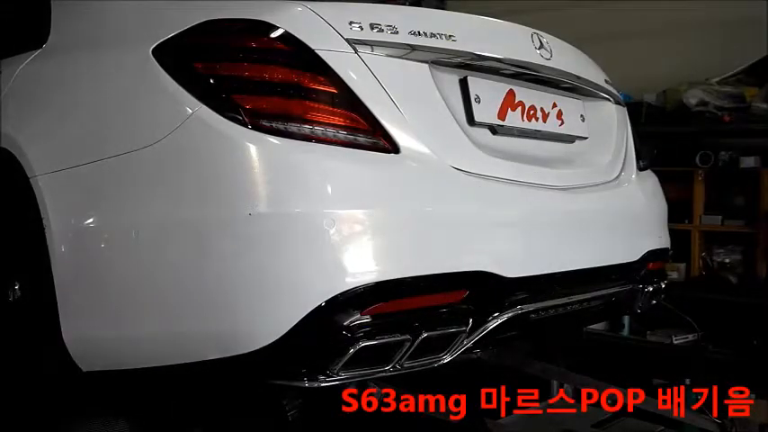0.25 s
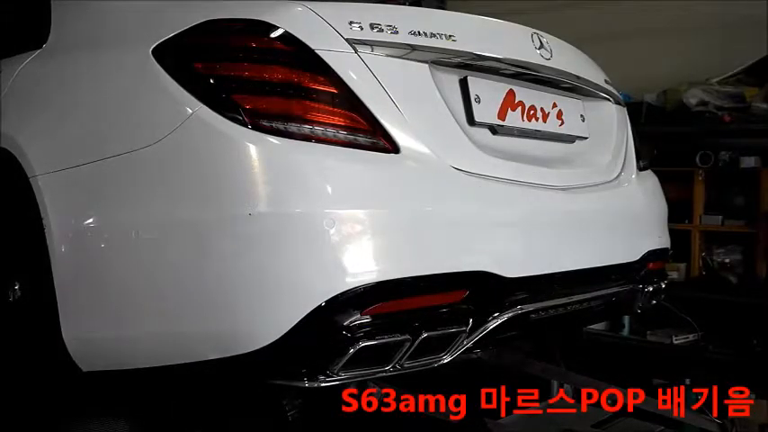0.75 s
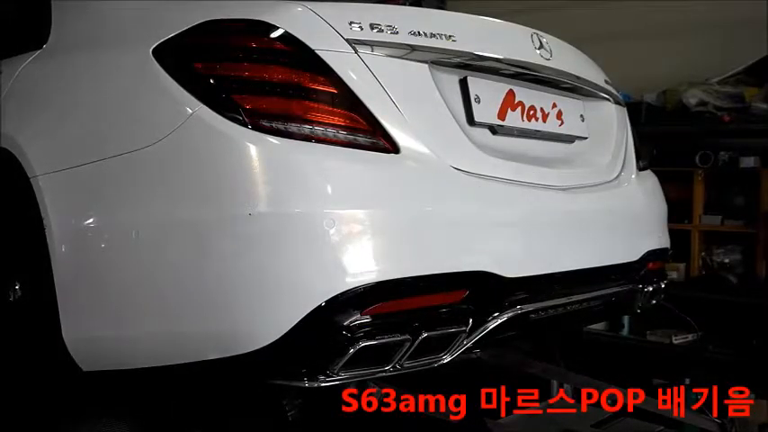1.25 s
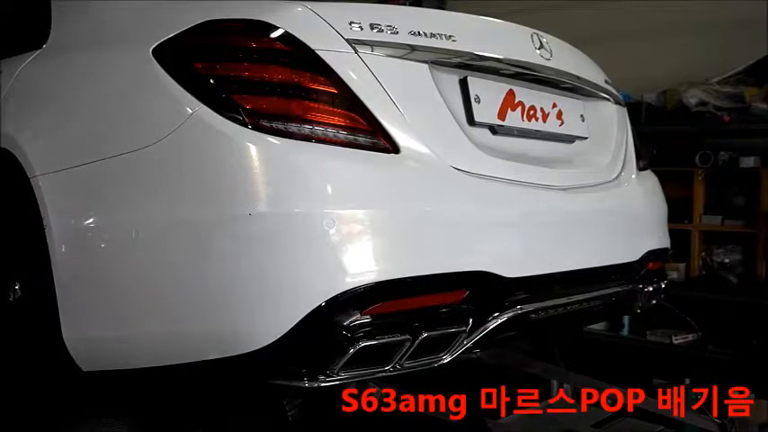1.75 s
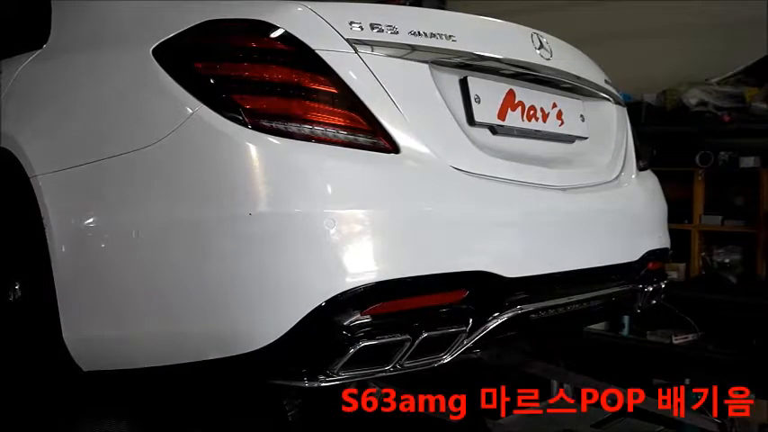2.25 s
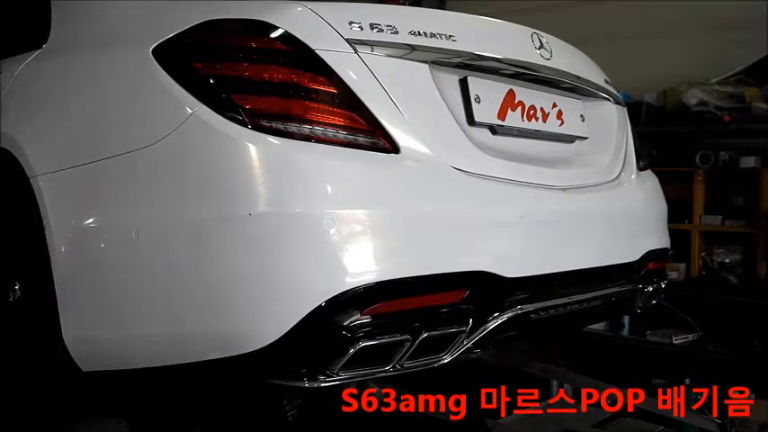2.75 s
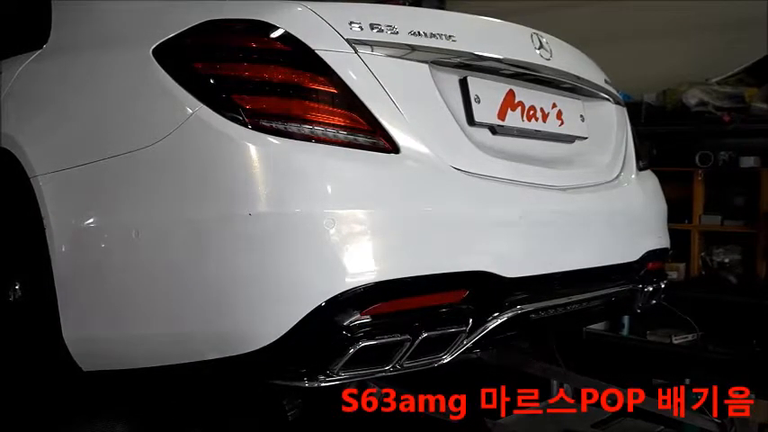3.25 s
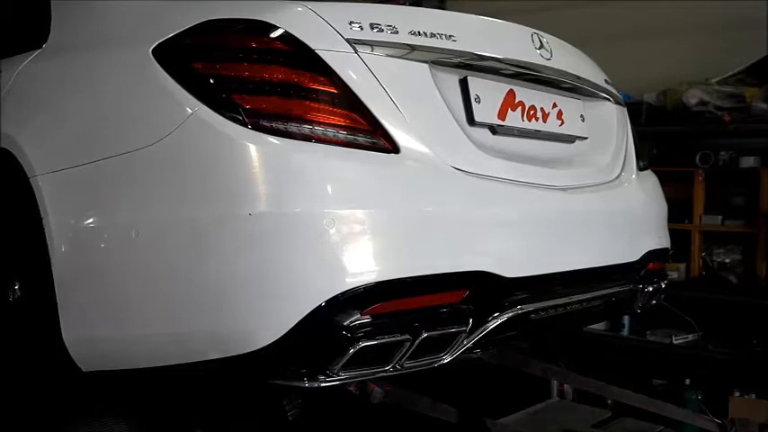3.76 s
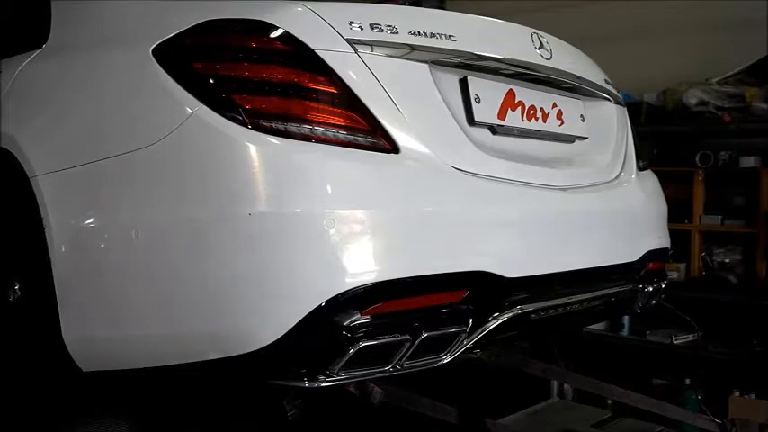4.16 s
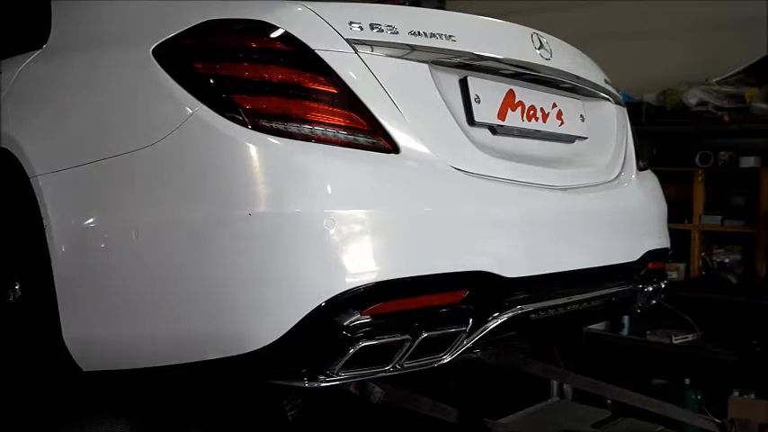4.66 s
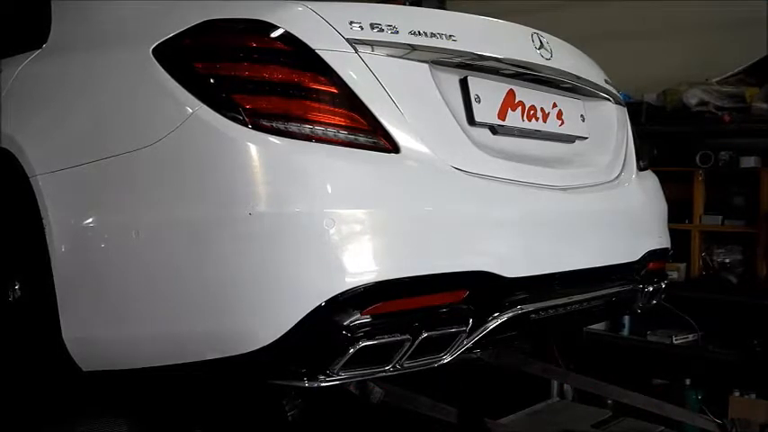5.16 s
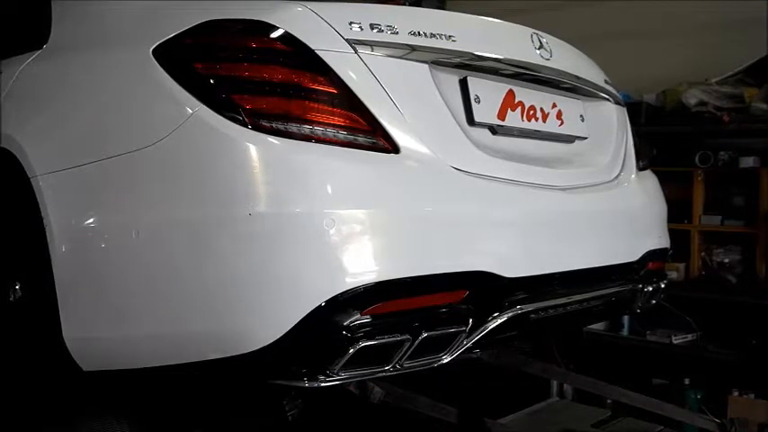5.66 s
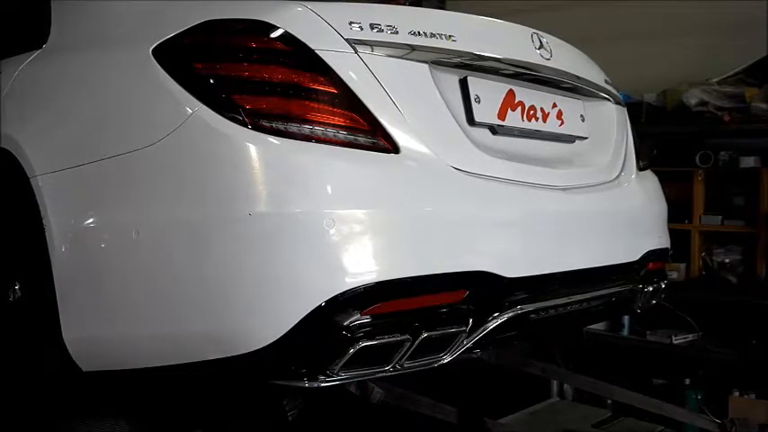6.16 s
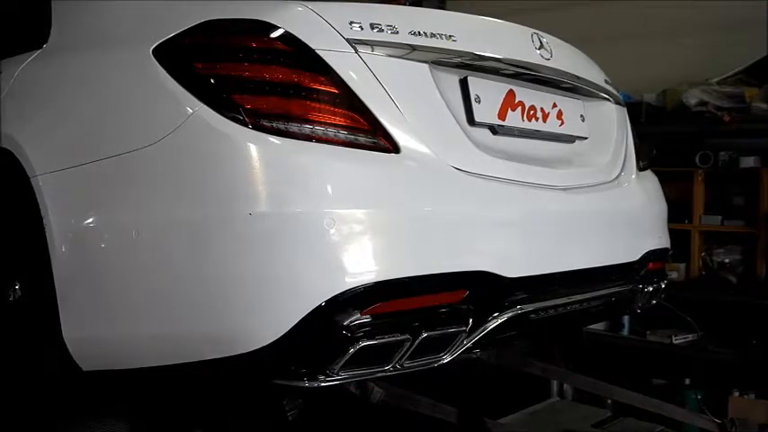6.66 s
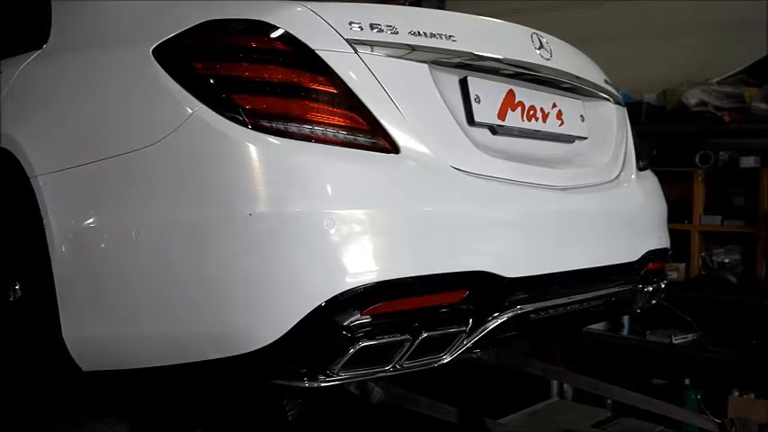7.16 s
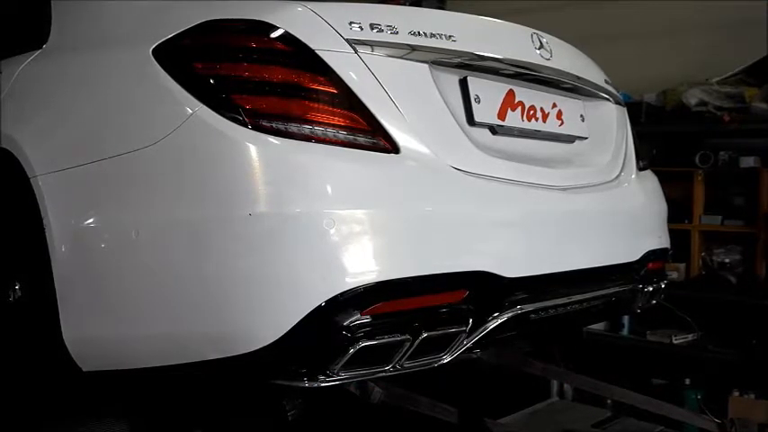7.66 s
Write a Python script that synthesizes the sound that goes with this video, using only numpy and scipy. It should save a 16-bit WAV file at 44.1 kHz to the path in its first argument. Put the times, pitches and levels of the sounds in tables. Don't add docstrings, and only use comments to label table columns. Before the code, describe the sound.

A powerful eight-cylinder car idles low in a hard-walled workshop, microphone close behind the tailpipes. The driver stabs the throttle five times; each rev roars up with a raspy, uneven growl, then breaks as the throttle shuts into gunshot-like cracks and muffled burbles. The engine drops back to a rumbling idle before the next stab, while the walls ring on.

```python
import sys
import numpy as np
from scipy import signal
from scipy.fft import rfft, irfft
from scipy.io import wavfile
from scipy.ndimage import uniform_filter1d

SR = 44100
rng = np.random.default_rng(int(sys.argv[2]) if len(sys.argv) > 2 else 0)


def master_out(mix):
    frames = np.transpose(np.atleast_2d(mix))
    ceiling = np.clip(frames, -1, 1)
    pcm = np.round(ceiling * 32767).astype(np.int16)
    wavfile.write(sys.argv[1], SR, pcm)


def gain_from_db(level_db):
    decades = np.asarray(level_db, float) / 20
    return 10 ** decades


N = 349272
TIME = np.arange(N) / SR

# stab [s], first crack [s], back at idle [s], top speed [firings/s],
# speed just before the stab [firings/s].
BLIPS = [
    (.305, 0.961, 1.554, 250, 65.5),
    (1.87, 2.544, 3.15, 245, 62),
    (3.43, 4.052, 4.85, 242, 68),
    (5.049, 5.63, 6.33, 242, 72.7),
    (6.545, 7.044, 7.72, 255, 72),
]
# time after the stab [s], share of top speed.
CLIMB = [(.06, 0.35), (.17, 0.68), (.32, 0.98), (.43, 1.0)]
FALL = [(.36, .64), (.6, .61)]
CLIMB_PACE = [.85, 1.15, .98, 1.08, 1.02]
START_PER_S, IDLE_PER_S = 76, 80
OPEN_BEFORE_S, OPEN_AFTER_S = 0.03, 0.041
LIFT_S = 0.33

# before the stab [dB], while revving [dB], clamped by the crack [dB],
# the same for the hiss [dB], back at idle [dB].
GAIN = [(8.5, 1, -7, -15, 0.5), (-0.5, -0.3, -2.6, -2, 4), (4.5, 1.06, -8.3, 5, -2), (-2.5, 0, -9, 1, -2.5),
        (-2.5, 0.57, 0, 8.5, 7.5)]
START_GAIN_DB, CLAMP_S = 12.5, 0.018
# held [s], push at the stab [dB], at the end of the hold [dB],
# at lift-off [dB], share of the swell.
FOOT = [(0.27, -2.5, 0, -1.5, 1.29), (0.45, -0.5, 2.5, -1, 0.76), (0.21, -1.5, -0.5, -2.5, 1.28),
        (0.14, -1.5, 1, -1.7, 0.89), (0.2, -2, 3.5, -2, 0.64)]
# thump just before the first crack [dB], back at idle [dB],
# growl left after lift-off [dB].
BASS = [(-5, 2, 0.5), (0, -1.5, -2), (10.5, 1, -0.5), (-5, 1, -3), (4, -12.5, -7.5)]
THUMP_S = 0.029

# firing tone, boom, growl, rasp, bite, hiss.
# Level at idle [dB].
IDLE_DB = [-40, -31, -40.5, -41.5, -41, -52.5]
IDLE_RISE_DB = [5, 19, 4.7, 0, 1, 10.5]
REV_DB = [-28.5, -31, -22.5, -25, -27, -36]
LOAD_DB = [8.5, 21, 13, 8, 12, -3.5]
LOAD_S = [0.052, 0.047, 0.24, 0.22, 0.19, 0.22]
LIFT_DB = [0.1, 7.6, 0.11, 3.95, 1.6, 4.9]
COAST_DB = [-58, -33.5, -26.5, -26, -28.5, -44.5]
KICK_DB = [-60, -40.5, -39, -31.5, -30.5, -86]
EAGER = [.9, 0.63, 0.65, 1.1, 0.91, 1.1]
KICK_T60_S = 0.43
KICK_DUCK = 0.52

CYLINDERS_DB = [2.5, -4, 2, -7, -2, -5.5, -2, -6.5]
# frequency [Hz], width [Hz], level [dB].
BOOM = [(55, 31, -6), (71.7, 28, -5)]
GROWL = [(154.8, 15.6, 3.5), (196, 15.3, -3.5), (243.2, 29.5, -4.5)]
RASP = [(335, 22, -7), (389, 51, -2), (487.5, 75, 0.5), (625, 124, 0), (732, 89, -1.5), (843, 131, -3)]
BITE = [(1016, 95, 3), (1214, 90, 5), (1440, 323, -1.5), (2004, 237.5, 0), (2460, 590, -8),
        (3430, 940, -10.5)]
POP_PIPE = [(174, 23, -46), (600, 680, -2), (986, 240, 3), (1930, 31, 9), (3360, 910, -4.5)]
CRACK_PIPE = [(3300, 1500, -9.5), (5380, 1640, -0.5), (9300, 4000, -9), (13900, 2200, -12.5)]
RING = [(376, 340, -19), (710, 290, -5.5), (1340, 1080, -4.5), (2120, 1270, -3.5), (3140, 660, -6)]
PIPE_HZ, PIPE_WIDTH_HZ, PIPE_DB, LOADED_BLOOM = 156, 22, 13, 0.3

# frequency [Hz], density [dB per Hz].
HISS = [(1290, -20), (2200, -7.5), (4610, -8.5), (4840, -11), (6980, -17.5), (12200, -20.5), (15700, -27),
        (16300, -44)]
# time [s], level [dB].
WHISTLE = [
    (0.272, -42),
    (1.84, -50),
    (3.38, -48),
    (4.981, -59),
    (6.48, -59),
]
# frequency [Hz], density [dB per Hz].
SHOP = [(150, -40), (250, -4.5), (501, -2.5), (735, -5), (1200, -4), (2910, -6), (12300, -42), (16000, -44)]
SHOP_DB = -41.5
# start [s], peak [dB], bite against peak [dB].
BURBLES = [(0.308, -14, -15), (0.36, -6, -10), (0.704, -3, -14), (0.824, -3, -20), (1.209, -15.5, -11),
           (1.299, -19, -15), (1.419, -19.5, -16), (1.875, -14, -3), (2.258, -13, 1), (2.517, -12, -15),
           (2.525, -10, -16), (2.565, -22, -5), (2.779, -7, -13), (3.435, -11, 3), (3.454, -6, 0),
           (4.041, -8, -5), (4.088, -23, -7), (4.449, -12.5, -8), (5.063, -11, 3), (5.609, -24, -4),
           (5.8, -9, -2), (5.867, -14, -11), (6.583, -9, 2.5), (7.329, -8, -15), (7.449, -13, -8),
           (7.598, -38, -7), (7.619, -13, 3), (7.634, -7, -9)]
# start [s], peak [dB], crack against peak [dB],
# wall ring against peak [dB], treble of the ring [dB].
POPS = [(0.9586, -1, 11.5, -23, -1), (2.5326, -3.5, -2, -17.5, -6.5), (2.7363, -0.4, -5.5, -20, -7.5),
        (2.746, -7, -16, -21, -15), (4.054, 2, -5, -23, -5), (4.2133, 1, -7, -29, -11),
        (4.2338, -3.5, -2.5, -28, -9), (4.4215, -2.5, -3, -19, -4), (4.7792, -37, -12, -15, -11),
        (5.6353, 0.4, 10, -24.5, -1), (5.8113, -6, 2.5, -24.5, -7), (5.905, -8, -4, -19.5, -4),
        (7.0458, 0, -9, -23, -5), (7.0646, -3, -1.5, -22.5, -3), (7.2457, -10.5, -28, -22, -13),
        (7.4234, 0, 10, -24.5, -2)]

# frequency [Hz], t60 [s].
WALLS = [(60, 2.4), (400, 0.9), (1200, 1.76), (3000, 1.85), (8000, 0.77), (15000, 0.46)]
# frequency [Hz], correlation.
LIKENESS = [(60, 1), (150, 1), (400, 0.97), (1000, 0.91), (2000, 0.76), (4000, 0.17), (12000, 0.011)]
# delay [s], level [dB].
ECHOES = [
    (.012, -21),
    (.026, -21),
    (.037, -27),
]
# delay [s], level [dB].
FLOOR_ECHO = (.0024, -2.5)
BASS_LEAN = 0.16


def rms_one(x):
    return x / np.sqrt(np.mean(x ** 2) + 1e-20)


def at_hz(points, hz):
    table_hz, values = np.transpose(points)
    return np.interp(np.log(hz + 1), np.log(table_hz), values)


def wander(per_s):
    points = rng.standard_normal(int(N / SR * per_s) + 2)
    return np.interp(TIME * per_s, np.arange(len(points)), points)


def resonate(x, modes):
    out = 0
    for k, (hz, width, db) in enumerate(modes):
        r = np.exp(-np.pi * width / SR)
        feed = np.array([1, 0, -1]) * (1 - r * r) / 2
        feedback = [1, -2 * r * np.cos(2 * np.pi * hz / SR), r * r]
        out = out + (-1) ** k * gain_from_db(db) * signal.lfilter(feed, feedback, x + 1e-18)
    return out


def dying(clicks, t60):
    return signal.lfilter([1], [1, -gain_from_db(-60 / (t60 * SR))], clicks + 1e-18)


def diffuse(size, spectrum):
    hz = np.fft.rfftfreq(size, 1 / SR)
    mid, side = rfft(rng.standard_normal((2, size)))
    alike = np.clip(at_hz(LIKENESS, hz), 0, 1)
    both = np.sqrt(1 + alike) * mid + np.sqrt(1 - alike) * side * [[1], [-1]]
    return rms_one(irfft(both * gain_from_db(at_hz(spectrum, hz)), size))


def walls(x, swell_s=0.0078, running=False):
    t = TIME[:SR]
    noise = rfft(diffuse(SR, [(20, 0), (20000, 0)]))
    octave = np.log2(np.arange(1, SR // 2 + 2) / 30)
    ring = 0
    for k in range(10):
        band = irfft(noise * np.clip(1 - abs(octave - k), 0, 1), SR)
        ring = ring + band * gain_from_db(-60 * t / at_hz(WALLS, 30 * 2 ** k))
    ring = ring * (1 - np.exp(-(t / swell_s) ** 2))
    wet = signal.fftconvolve(x[None], rms_one(ring) / np.sqrt(SR), axes=1)
    wet[:, :SR - 1] += running * wet[:, N:]
    return wet[:, :N]


def each_blip(start, points):
    rows = [(0.0013, start)]
    for k, blip in enumerate(BLIPS):
        rows.extend(points(k, *blip))
    s, values = np.transpose(rows)
    return np.interp(TIME, s, values)


def speed():
    def rev(k, stab, crack, idle, top, sag):
        peak = stab + CLIMB_PACE[k] * CLIMB[-1][0]
        climb = [(stab + CLIMB_PACE[k] * s, top * share) for s, share in CLIMB]
        fall = [(peak + way * (idle - peak), top * share) for way, share in FALL]
        return [(stab - OPEN_BEFORE_S, sag)] + climb + fall + [(idle, IDLE_PER_S)]
    return each_blip(START_PER_S, rev)


def throttle(before, opened, lifted, cracking, clamped, settled):
    return each_blip(0, lambda k, stab, crack, idle, *_: zip(
        [stab - OPEN_BEFORE_S, stab + OPEN_AFTER_S, stab + LIFT_S, crack, crack + CLAMP_S, idle],
        [before, opened, lifted, cracking, clamped, settled]))


def gain_db(column):
    return each_blip(START_GAIN_DB, lambda k, stab, crack, idle, *_: zip(
        [stab - OPEN_BEFORE_S, stab + OPEN_AFTER_S, crack, crack + CLAMP_S, idle],
        np.array(GAIN[k])[[0, 1, 1, column, 4]]))


def pop_kicks():
    s, peak_db, crack_db = np.transpose(POPS)[:3]
    kicks = np.zeros(N)
    kicks[(s * SR).astype(int)] = gain_from_db(peak_db - KICK_DUCK * crack_db)
    return dying(kicks, KICK_T60_S)


def levels():
    idle_rise = throttle(1, 0, 0, 0, 0, 0)
    opening = throttle(0, 1, 1, 1, 0, 0)
    lift = throttle(0, 0, 0, 1, 0, 0)
    lift = lift * each_blip(1, lambda k, stab, crack, *_: [(stab, FOOT[k][4]), (crack, FOOT[k][4])])
    coast = throttle(0, 0, 0, 0, 1, 0)

    opened = np.array(BLIPS)[:, 0] + OPEN_AFTER_S
    latest = np.maximum(np.searchsorted(opened - 0.1, TIME) - 1, 0)
    since = np.maximum(TIME - opened[latest], 0)

    push_db = each_blip(0, lambda k, stab, crack, *_: zip(
        [stab - OPEN_BEFORE_S, stab + OPEN_AFTER_S, stab + FOOT[k][0], stab + LIFT_S, crack],
        [0, *FOOT[k][1:4], 0]))
    bass_db = each_blip(0, lambda k, stab, crack, idle, *_: zip(
        [stab, crack - THUMP_S, crack - THUMP_S / 4, crack + CLAMP_S, idle],
        [0, 0, BASS[k][0], 0, BASS[k][1]]))
    growl_db = each_blip(0, lambda k, stab, crack, *_: zip(
        [stab + FOOT[k][0], stab + LIFT_S, crack, crack + CLAMP_S],
        [0, BASS[k][2], BASS[k][2], 0]))

    kicks = pop_kicks()
    exhaust = gain_db(column=2) + push_db
    hiss = gain_db(column=3)
    low = exhaust + bass_db
    out = []
    for k, gain in enumerate([low, low, exhaust + growl_db, exhaust, exhaust, hiss]):
        rev = opening ** EAGER[k]
        db = np.maximum(1 - rev - coast, 0) * IDLE_DB[k] + idle_rise * IDLE_RISE_DB[k]
        db = db + lift * LIFT_DB[k] + np.minimum(coast, 1 - rev) * COAST_DB[k]
        db = db + rev * (REV_DB[k] + LOAD_DB[k] * np.exp(-since / LOAD_S[k])) + gain
        out.append(20 * np.log10(gain_from_db(db) + gain_from_db(KICK_DB[k]) * kicks))
    return out


def shop_floor():
    return gain_from_db(SHOP_DB) * diffuse(N, SHOP)


def firings(per_s, rough_db, jitter):
    at = np.flatnonzero(np.diff(np.floor(np.cumsum(per_s) / SR)))
    chance = rng.standard_normal((len(at), 2))
    late = (jitter[at] * chance[:, 1] * SR / per_s[at]).astype(int)
    strength_db = np.resize(CYLINDERS_DB, len(at)) + rough_db[at] * chance[:, 0]
    clicks = np.zeros(N)
    clicks[np.clip(at + late, 0, N - 1)] = gain_from_db(strength_db)
    return clicks / np.sqrt(per_s / 100)


def firing_tone(per_s, racing, overrun, tone_db):
    near_pipe = np.exp(-((per_s - PIPE_HZ) / PIPE_WIDTH_HZ) ** 2)
    bloom_db = PIPE_DB * (LOADED_BLOOM + overrun) * near_pipe
    tone_db = tone_db + (1.9 + 2.5 * racing) * wander(9.2) + bloom_db
    blur = 0.06 * per_s * racing * wander(40)
    phase = 2 * np.pi * np.cumsum(per_s + blur) / SR
    return np.sqrt(2) * gain_from_db(tone_db + 3 - 4 * racing - 14 * overrun) * np.sin(phase)


def engine(tone_db, boom_db, growl_db, rasp_db, bite_db):
    per_s = speed()
    racing = np.clip((per_s - 85) / 25, 0, 1)
    falling = 1. * (np.gradient(per_s) < 0)
    overrun = racing * uniform_filter1d(falling, size=2000)
    out = firing_tone(per_s, racing, overrun, tone_db) * gain_from_db([[0.8], [-0.8]])
    pulses = firings(per_s, rough_db=1.5 + 1.5 * racing + 1.0 * overrun, jitter=0.05 + 0.45 * overrun)
    puffs = dying(pulses, 0.016) * rng.standard_normal(N)
    unloaded = 1 - racing + overrun
    boom_db = boom_db - 17 + 14 * racing
    # resonances, level in dB, share of puffs, wall level in dB, fits in dB, tilt in dB per octave
    layers = [(BOOM, boom_db, 0.3, 0.5, 1.4, 0.1),
              (GROWL, growl_db + 0.5, 0.15, -1.5, 0.8, 5.0),
              (RASP, rasp_db, 0.25, -1, 2.2, 4.0),
              (BITE, bite_db, 0.25, -1.5, 2.2, 3.0)]
    for modes, db, puff, wet_db, fits_db, tilt_db in layers:
        pipe = 0
        for k, mode in enumerate(modes):
            octaves = np.log2(mode[0] / modes[0][0])
            feed = gain_from_db(fits_db * wander(22) - tilt_db * unloaded * octaves)
            pipe = pipe + (-1) ** k * resonate((pulses + puff * puffs) * feed, [mode])
        direct = (0.28 + 0.58 * racing) * pipe
        out = out + gain_from_db(db) * rms_one(direct + gain_from_db(wet_db) * walls(pipe, running=True))
    silencers = signal.butter(2, 5500, fs=SR, output="sos")
    return signal.sosfilt(silencers, out)


def turbine(hiss_db):
    swell = sum(gain_from_db(db) * np.exp(-((TIME - s) / 0.025) ** 2) for s, db in WHISTLE)
    whistle = swell * rms_one(resonate(rng.standard_normal((2, N)), [(12600, 520, 0)]))
    return gain_from_db(hiss_db + 2.0 * wander(30)) * diffuse(N, HISS) + whistle


def burbles():
    s, peak_db, bite_db = np.transpose(BURBLES)
    at = np.round(s * SR).astype(int)
    flame = rng.standard_normal(N)
    low, high = np.zeros((2, N))
    low[at], high[at] = gain_from_db(peak_db), gain_from_db(peak_db + bite_db)
    burst = gain_from_db(8.5) * resonate(dying(low, 0.062) * flame + 4.3 * low, GROWL + RASP)
    burst = burst + gain_from_db(5.5) * resonate(dying(high, 0.012) * flame + 1.0 * high, BITE)
    lift_echo = gain_from_db(-2.5) * np.roll(burst, round(0.012 * SR))
    return burst + lift_echo * [[1], [0.6]]


def pops():
    s, peak_db, crack_db, ring_db, treble_db = np.transpose(POPS)
    at = np.round(s * SR).astype(int) - 8
    dull, bright, ring, treble = np.zeros((4, N))
    dull[at], bright[at] = gain_from_db(peak_db), gain_from_db(peak_db + crack_db)
    ring[at], treble[at] = gain_from_db(peak_db + ring_db), gain_from_db(peak_db + ring_db + treble_db)
    flame = rng.standard_normal((3, N))

    spike = np.convolve(dull, -np.hanning(15))[:N]
    burst = spike + 0.45 * dying(dull, 0.061) * flame[0]
    body = 1.1 * spike + gain_from_db(4.0) * resonate(burst, POP_PIPE)
    floor_s, floor_db = FLOOR_ECHO
    body = body + gain_from_db(floor_db) * np.roll(body, round(floor_s * SR))

    flash = dying(np.roll(bright, 9), 0.001) + 0.19 * dying(bright, 0.03)
    sparks = flash * (flame[1] + 0.5 * flame[2] * [[1], [-1]])
    heat = np.interp(TIME, s, gain_from_db(0.32 * crack_db))

    def crackle(x):
        return resonate(x, CRACK_PIPE[:2]) + resonate(heat * x, CRACK_PIPE[2:])

    direct = body + gain_from_db(4.5) * crackle(sparks)
    echoes = 0
    for k, (delay, db) in enumerate(ECHOES):
        sides = [[1], [0.5 + 0.58 * (-1) ** k]]
        echoes = echoes + gain_from_db(db) * np.roll(direct, round(delay * SR), axis=1) * sides
    blast = gain_from_db(47.5) * resonate(ring, RING) + gain_from_db(41.0) * crackle(treble)
    return direct + echoes + walls(blast)


def scene():
    *exhaust_db, hiss_db = levels()
    return shop_floor() + engine(*exhaust_db) + turbine(hiss_db) + burbles() + pops()


def low_pass(x):
    return signal.sosfilt(signal.butter(12, 16360, fs=SR, output="sos"), x)


def record(dry):
    thin = signal.sosfilt(signal.butter(2, 35, "high", fs=SR, output="sos"), dry)
    bass = signal.sosfilt(signal.butter(2, 100, "low", fs=SR, output="sos"), thin)
    mix = np.clip(thin + BASS_LEAN * bass * [[1], [-1]], -1, 1)
    return low_pass(mix)


dry = scene()
out = record(dry)
master_out(out)
```